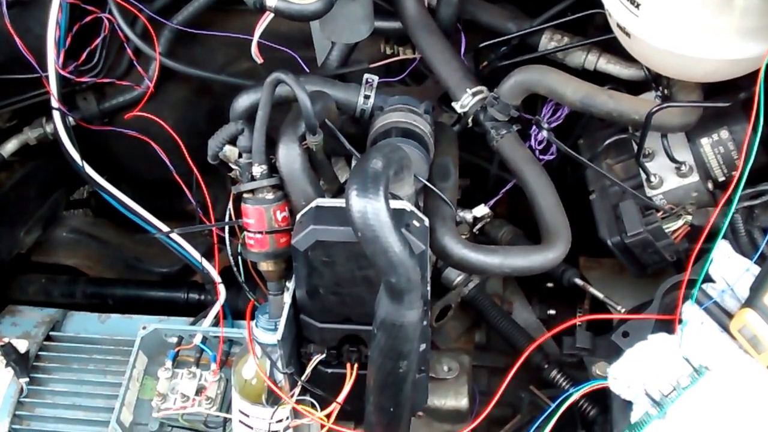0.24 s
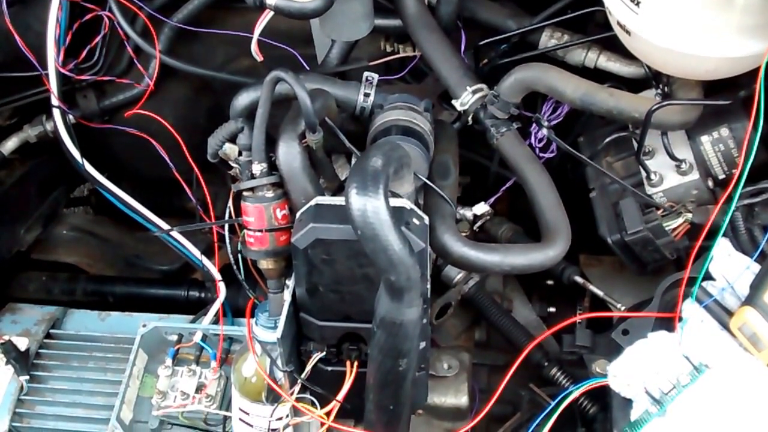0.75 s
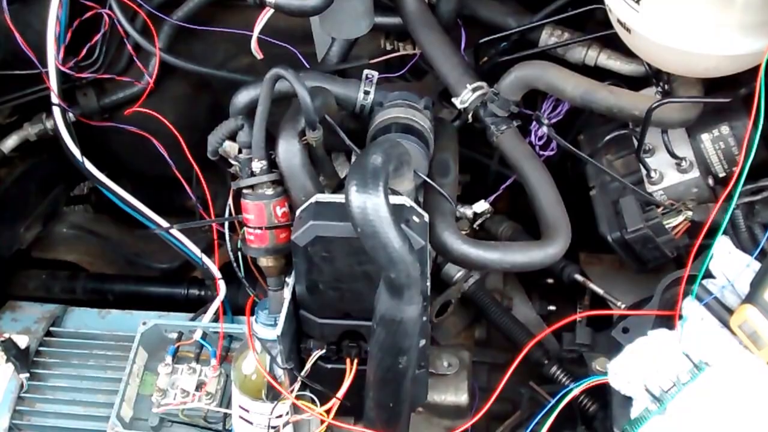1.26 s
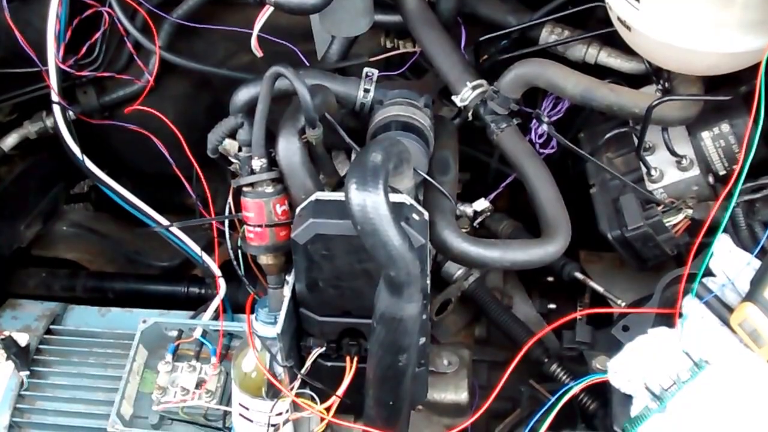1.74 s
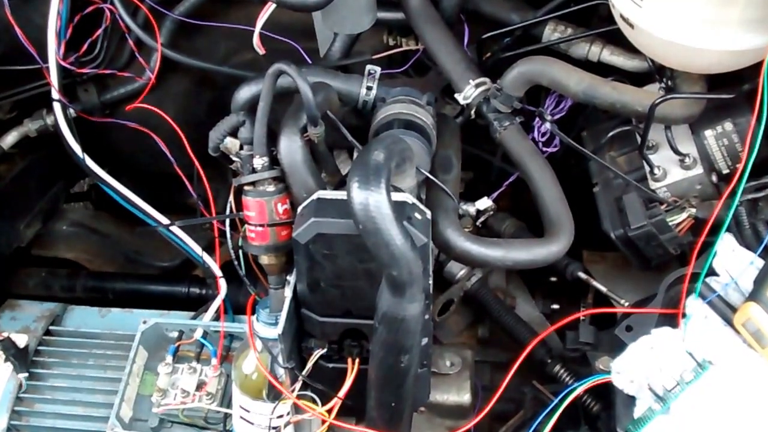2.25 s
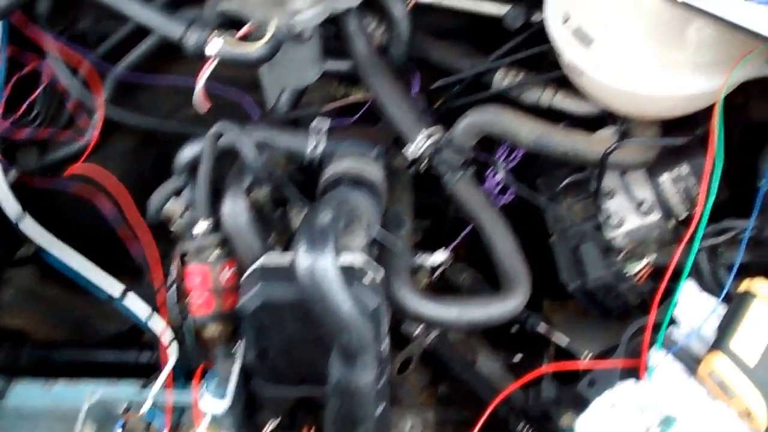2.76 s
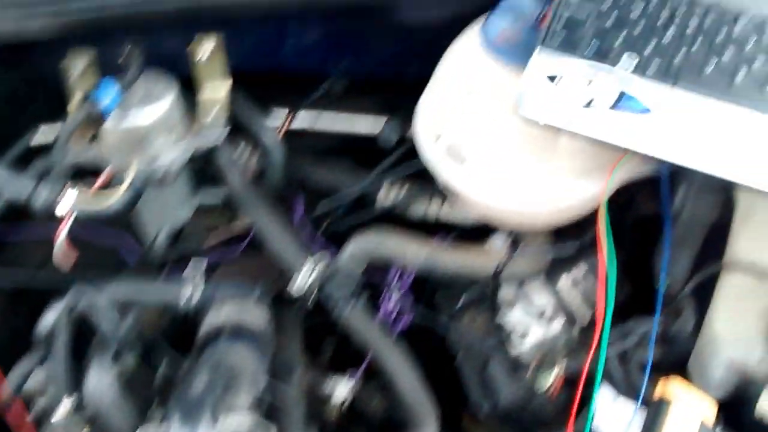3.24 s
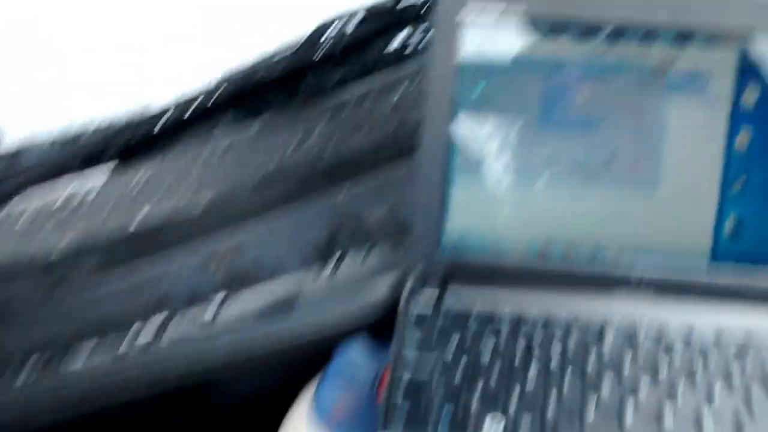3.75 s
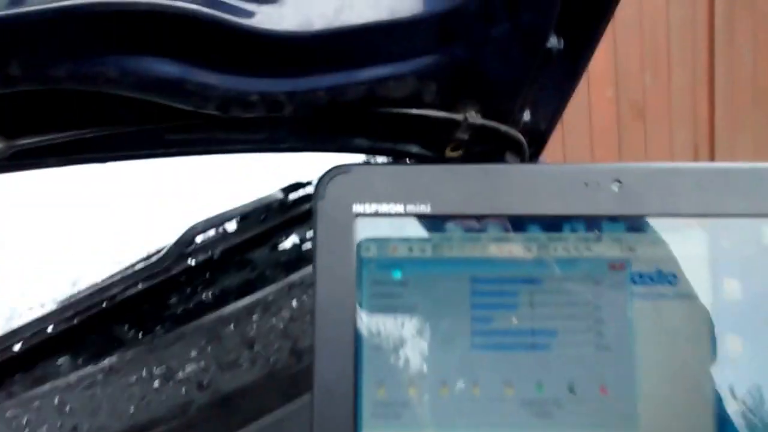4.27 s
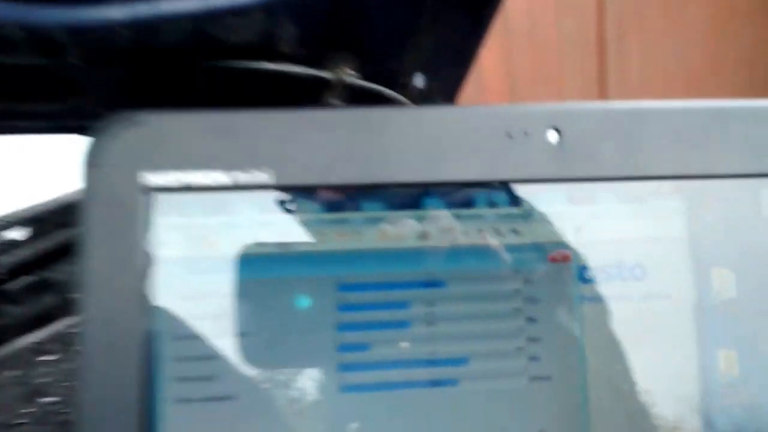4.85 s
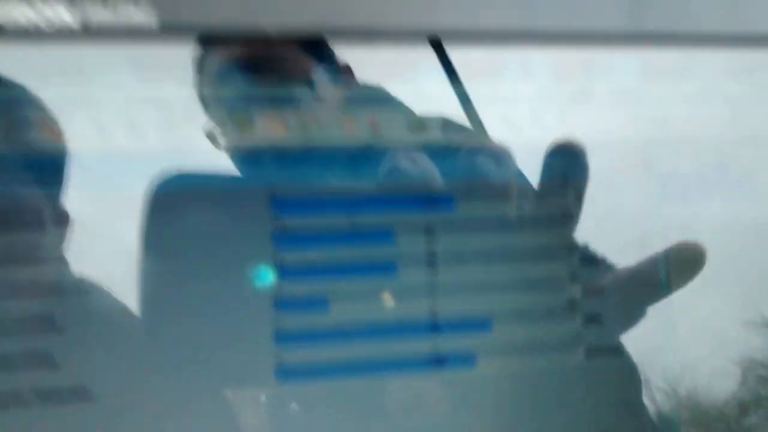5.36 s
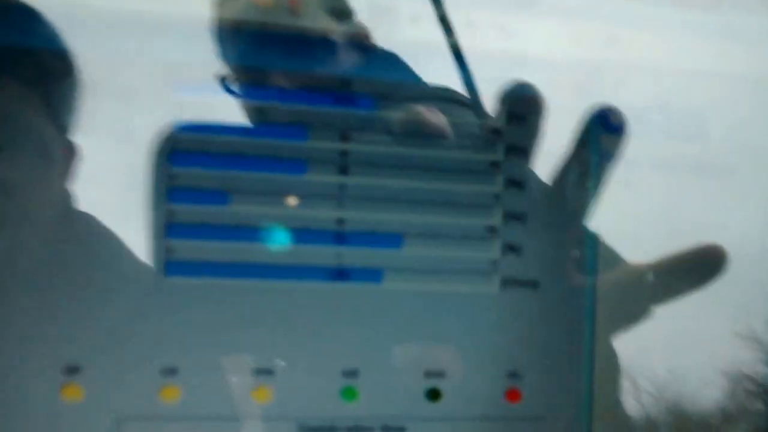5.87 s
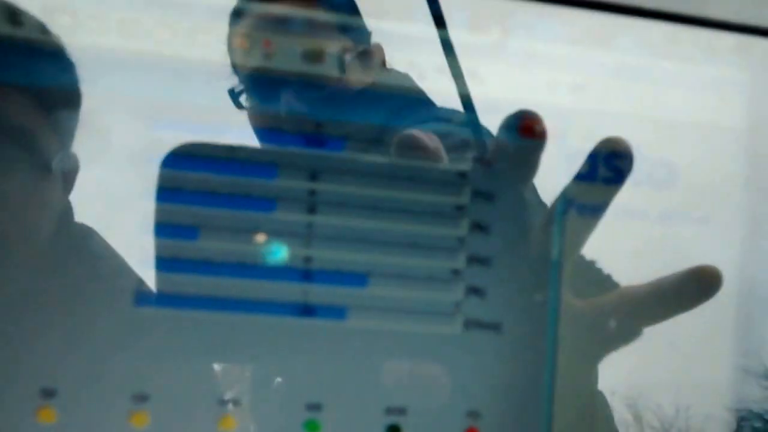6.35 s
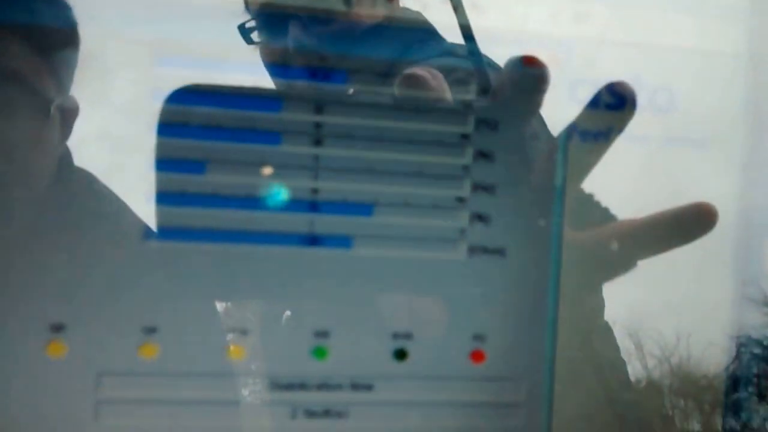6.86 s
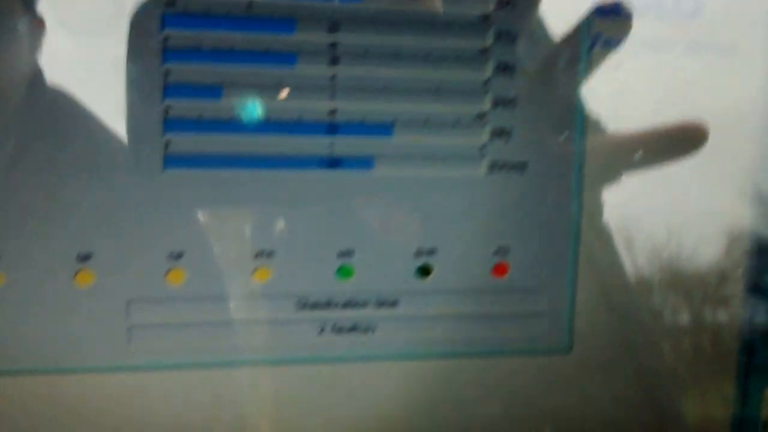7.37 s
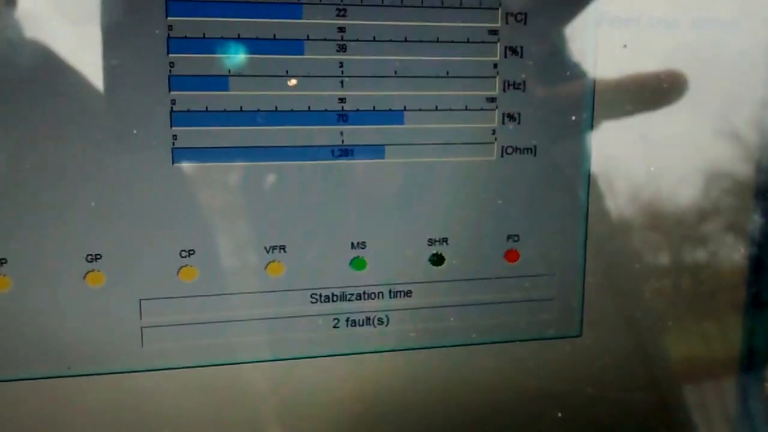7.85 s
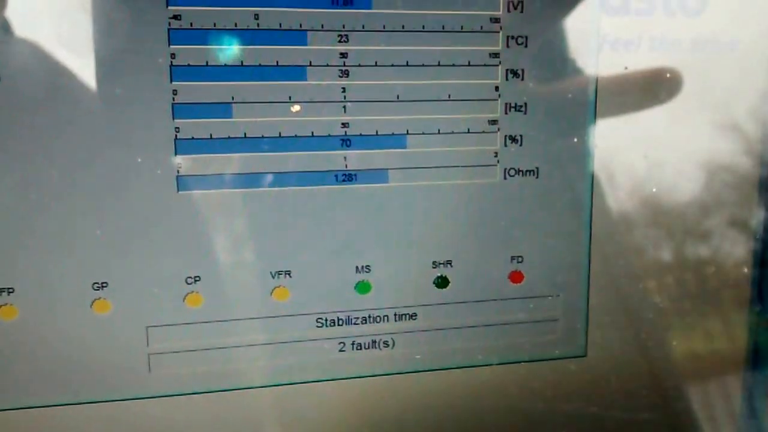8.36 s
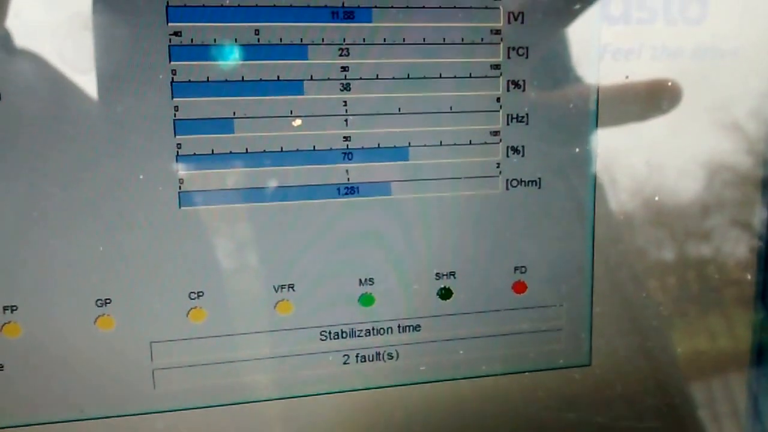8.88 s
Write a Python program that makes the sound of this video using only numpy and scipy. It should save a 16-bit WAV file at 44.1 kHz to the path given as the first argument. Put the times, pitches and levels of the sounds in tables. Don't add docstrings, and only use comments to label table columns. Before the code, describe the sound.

Low pulsing howls from a sputtering fuel burner surge and drop over rushing air and thin motor whine, with brief plastic taps midway.

```python
import sys
import numpy as np
from scipy import signal
from scipy.fft import rfft, irfft
from scipy.io import wavfile
from scipy.ndimage import uniform_filter1d

SR = 44100
rng = np.random.default_rng(int(sys.argv[2]) if len(sys.argv) > 2 else 0)


def undo_db(level):
    steps = np.asarray(level, float) / 20
    return 10 ** steps


def master_out(mix):
    frames = np.transpose(np.atleast_2d(mix))
    ceiling = np.clip(frames, -1, 1)
    pcm = np.round(ceiling * 32767).astype(np.int16)
    wavfile.write(sys.argv[1], SR, pcm)


N = 401751

SHAFT_HZ = 49.35
BASS_LAG_S = 0.00027

# time_s, place (0 at the heater, 1 turning away, 2 beside the wing)
MIC_PATH = [(0, 0.033), (3.4, 0.074), (4.5, 0.98), (5.0, 1.25), (5.8, 1.37), (6.2, 1.71), (9.11, 1.7)]
# start_s, peak_db, left_minus_right_db
FUEL_CATCHES = [(0.523, -27, -1), (0.655, -34, -9), (.723, -37, -0.5), (0.8, -23.5, -1), (1.421, -26.5, 0),
                (1.453, -25, 1), (1.875, -24, 2), (1.887, -26, -2), (2.363, -31, 3), (2.717, -42, -2),
                (2.786, -28, 2), (2.799, -27, 3), (2.847, -33, -1), (3.118, -40, -3), (3.193, -26, 4),
                (3.803, -25, 2), (4.43, -43, 2), (4.953, -38, -2), (5.492, -28, -9), (5.817, -22, 0),
                (6.259, -25, 6), (6.677, -44, 2), (6.764, -20.5, 3), (6.955, -29, 0), (7.004, -21.5, 4),
                (7.028, -25.5, 3), (7.352, -36, 1.0), (7.774, -25, 4), (8.051, -35, 0), (8.149, -29, 1),
                (8.58, -26, -3), (8.772, -21.5, 3), (8.968, -36, 6)]


def rms_one(x):
    return x / np.sqrt(np.mean(x ** 2) + 1e-20)


def in_time(rows):
    s, *columns = np.transpose(rows)
    return [np.interp(np.arange(N) / SR, s, c) for c in columns]


def at_hz(points, hz):
    table_hz, value = np.transpose(points)
    return np.interp(np.log(hz), np.log(table_hz), value)


def drift(hz):
    r = np.exp(-2 * np.pi * hz / SR)
    wander = signal.lfilter([1], [1, -2 * r, r * r], rng.standard_normal(N + SR))
    return rms_one(wander[SR:])


def resonance(x, hz, width_hz):
    r = np.exp(-np.pi * width_hz / SR)
    turn = 2 * np.pi * hz / SR
    return signal.lfilter([(1 - r * r) / 2, 0, (r * r - 1) / 2], [1, -2 * r * np.cos(turn), r * r], x + 1e-18)


def pan(x, lr_db, lag_s=0):
    left = np.interp(np.arange(N) - lag_s * SR, np.arange(N), x)
    return np.array([left * undo_db(lr_db / 2), x * undo_db(-lr_db / 2)])


def strikes(events, db=0):
    out = np.zeros((2, N))
    for row in events:
        sides = undo_db(np.array([0.5, -0.5]) * row[-1])
        out[:, min(round(row[0] * SR), N - 1)] = undo_db(row[1] + db) * sides
    return out


def mic_place():
    return in_time(MIC_PATH)[0]


def at_spot(column):
    # rumble_db, exhaust_roar_db, casing_rasp_db, hiss_db, whine_left_minus_right_db, overtone_left_minus_right_db
    spot_levels = [
        (-38.5, -42.5, -46.5, -60.5, -5.5, 0),
        (-38.5, -43, -43.5, -57.5, 2.5, 0.5),
        (-35.5, -41, -44.5, -58, 4.5, -3),
    ]
    return np.interp(mic_place(), [0, 1, 2], np.array(spot_levels)[:, column])


def swells():
    # peak_s, level_db, rise_s, fall_s
    swell_rows = [(0.014, -12.5, 0.034, 0.042), (.1, -15.5, 0.049, 0.13), (0.539, -13, 0.11, 0.024),
                  (.41, -32.5, 0.029, 0.019), (1.29, -26, 0.019, 0.015), (1.34, -23, 0.012, 0.024),
                  (5.21, -42, 0.059, 0.044), (6.47, -23.5, 0.014, 0.036), (8.27, -25, 0.045, 0.053),
                  (.673, -14.5, 0.19, 0.028), (.829, -11.5, 0.2, .16), (1.449, -12.5, 0.085, 0.14),
                  (1.902, -11, 0.065, 0.11), (2.373, -12, 0.1, 0.097), (2.582, -22, 0.08, .03),
                  (2.779, -12.5, 0.16, 0.13), (3.236, -12.5, .21, 0.1), (3.823, -12.5, 0.069, 0.097),
                  (4.027, -13.5, 0.13, 0.15), (4.209, -16, 0.035, .058), (4.334, -13.5, 0.093, 0.069),
                  (4.429, -15.5, 0.038, 0.045), (4.846, -16.5, 0.1, 0.046), (4.975, -13.5, 0.058, 0.13),
                  (5.34, -15, 0.098, 0.1), (5.488, -16.5, 0.092, 0.064), (5.848, -15, 0.068, 0.22),
                  (6.273, -16, 0.37, 0.071), (6.756, -14.5, 0.12, 0.09), (7.005, -14.5, 0.087, 0.15),
                  (7.371, -15.5, 0.11, 0.035), (7.821, -15, 0.08, 0.13), (8.16, -14, 0.14, .1),
                  (8.612, -15.5, 0.097, 0.14), (8.795, -14, 0.054, 0.11), (9.035, -17.5, .08, 0.31)]
    roundness, idle_db = 1.859, -37.5
    t, power = np.arange(N) / SR, np.full(N, undo_db(idle_db) ** 2)
    for peak, db, rise, fall in swell_rows:
        near = slice(max(int((peak - rise) * SR), 0), int((peak + fall) * SR))
        away = np.where(t[near] < peak, (peak - t[near]) / rise, (t[near] - peak) / fall)
        arch = np.clip(1 - away ** roundness, 0, 1)
        power[near] += (undo_db(db) * arch) ** 2
    return np.sqrt(power)


def howl_strength():
    # centre_s, lost_share of pressure (0-1, negative = gained)
    falters = [(.655, -0.063), (.81, -0.13), (.87, -0.0085), (1.4, 0.18), (1.885, -0.021), (1.96, -0.26),
               (2.33, -0.029), (2.457, -0.7), (2.55, -0.015), (2.73, 0.12), (2.8, -0.21), (3.15, -0.049),
               (3.84, 0.072), (3.935, -0.36), (4.0, -0.11), (5.33, 0.083), (5.82, -.2), (6.79, -0.12),
               (7.82, -0.18), (8.74, .3), (.135, 0.88), (0.187, 0.56), (0.577, 0.69), (.61, 0.071),
               (.702, 0.39), (.76, -0.43), (.787, 0.19), (.91, -0.57), (1.44, -0.15), (1.5, 0.41),
               (1.552, -0.48), (1.584, 1), (1.93, 0.17), (2.44, 0.41), (2.684, 0.61), (2.768, 0.65),
               (2.854, -0.47), (3.27, -0.24), (3.3, -0.29), (4.8, 0.21), (4.97, 0.11), (5.425, 0.17),
               (5.84, 0.18), (5.914, 0.11), (5.97, -0.5), (6.041, .45), (6.13, -0.2), (6.185, 0.4),
               (6.28, -0.27), (6.69, 0.013), (6.735, 0.67), (7.785, -0.55), (7.9, -0.47), (8.07, 0.31),
               (8.101, 0.57), (8.23, 0.71), (8.63, -0.13), (8.66, 0.21), (8.71, -0.71), (9.03, -0.07)]
    falter_s = 0.015
    kick_share, kick_rise_s, kick_fall_s = 0.19, 0.0043, 0.018
    t, age = np.arange(N) / SR, np.arange(SR // 5) / SR
    kick = np.exp(-age / kick_fall_s) * (1 - np.exp(-age / kick_rise_s))
    catches = np.zeros(N)
    catches[(np.array(FUEL_CATCHES)[:, 0] * SR).astype(int)] = kick_share / kick.max()
    lift = 1 + signal.fftconvolve(catches, kick)[:N]
    dents = sum(min(share, 0.95) * np.exp(-((t - s) / falter_s) ** 2) for s, share in falters)
    return swells() * lift * (1 - dents)


def howl():
    howl_pan_db = [
        1.5,
        4,
        4.6,
    ]
    rest_hz, hz_per_pressure, hz_per_growth = 224.5, 22.15, 0.11
    pressure = howl_strength()
    lr_db = np.interp(mic_place(), [0, 0.3, 2], howl_pan_db)
    growth = np.gradient(uniform_filter1d(swells(), size=900)) * SR
    hz = rest_hz + hz_per_pressure * pressure + hz_per_growth * growth
    phase = np.pi / 2 + 2 * np.pi * np.cumsum(hz + 2.474 * drift(22.75)) / SR
    octave = undo_db(-34 + 2 * drift(12)) * np.sin(2 * phase + 1.3 + 1.2 * drift(12))
    tone = np.sin(phase) + octave
    skirt = rms_one(resonance(resonance(rng.standard_normal((2, N)), 272, 54), 272, 54))
    strength = pressure * undo_db(0.3 * drift(28))
    sung = pan(np.sqrt(2) * strength * tone, lr_db, BASS_LAG_S)
    return sung + undo_db(-18.5) * strength * skirt, phase


def puffs():
    age = np.arange(int(0.08 * SR)) / SR
    shape = np.exp(-age / 0.013) * (1 - np.exp(-age / 0.0027))
    envelope = signal.fftconvolve(strikes(FUEL_CATCHES, db=-15.0), [shape])[:, :N]
    exhaust = signal.butter(2, [330, 1600], "band", fs=SR, output="sos")
    noise = rms_one(signal.sosfilt(exhaust, rng.standard_normal(N)))
    burst = envelope * noise + signal.sosfilt(exhaust, strikes(FUEL_CATCHES, db=20.0))
    ringing = 8.2 * resonance(burst, 454, 91)
    return signal.sosfilt(exhaust, burst + ringing - strikes(FUEL_CATCHES, db=3))


def casing():
    # pitch_hz, width_hz, heater_db, last_spot_db, left_minus_right_db
    pipe_modes = [(892, 60, -58, -36.5, 8.5), (1248, 140, -48, -38, -0.5), (3312, 110, -59, -36.5, -13.5),
                  (3870, 81, -54, -48, -6.5)]
    passing_extra = [-2, 10, -5, 0]
    away, effort, out = mic_place() / 2, howl_strength() / 0.32, 0
    middle = np.clip(1.3 - 4 * abs(2 * away - 1.07), 0, 1)
    for (hz, width, near_db, far_db, lr_db), passing_db in zip(pipe_modes, passing_extra):
        ring = rms_one(resonance(resonance(rng.standard_normal(N), hz, width), hz, width))
        level_db = near_db + away * (far_db - near_db) + passing_db * middle + 0.8 * drift(9.6)
        drive = (effort + 0.35 * middle) ** 1.76
        out = out + pan(undo_db(level_db) * drive * ring, lr_db, BASS_LAG_S * (hz > 2000))
    return out


def ducking_db():
    # start_s, depth_db
    clamp_rows = [(0.029, 4), (.53, 3.5), (.8, 5), (1.459, 4), (1.91, 3), (2.39, 4), (2.8, 4), (3.2, 3),
                  (3.82, 3), (5.0, 1.5), (5.84, 2), (6.3, 0), (7.03, 2), (7.37, 0.5), (7.83, 1), (8.17, 0),
                  (8.8, 0.5)]
    headroom_db, clamp_s, regain_db_per_s = 1.48, 0.0053, 9
    t = np.arange(N) / SR
    starts, depth_db = np.transpose([(-0.86, 9.8), *clamp_rows])
    last = np.searchsorted(starts, t) - 1
    held = np.minimum(regain_db_per_s * (t - starts[last]) - depth_db[last], headroom_db)
    r = np.exp(-1 / (clamp_s * SR))
    return signal.lfilter([1 - r], [1, -r], held)


def spot_noise(spot, edges_hz):
    # pitch_hz, level_db
    colours = [
        [(15, -55.5), (25, -30), (169, -23), (233, -1.5), (368, -25.5), (919, -30.5), (1750, -41), (1950, -36),
         (2560, -40), (3930, -44), (11200, -55), (15500, -69.5)],
        [(15, -50), (25, -10.5), (227, 9.5), (368, -20), (1050, -33.5), (1300, -28.5), (1850, -43.5),
         (3830, -24), (6920, -40.5), (7700, -46), (11800, -41), (15500, -72)],
        [(15, -49), (25, -17.5), (169, -24.5), (227, -5), (433, -13.5), (1270, -26), (1800, -35), (3260, -41.5),
         (6920, -46), (7500, -51), (11800, -51.5), (15500, -58.5)],
    ]
    # pitch_hz, width_hz, boost_db
    peaks_and_dips = [
        [(135.3, 10, 12.6), (516, 39, 3), (810, 30, -5.5), (898, 80, 6), (1010, 90, -4.5), (1330, 70, -5.5),
         (1440, 80, 3.5), (1256, 97, 9.6), (3060, 150, 1.9), (3960, 72, 4.6), (6800, 240, 5.1), (11000, 440, 6),
         (11500, 140, 7.4), (11900, 200, 4)],
        [(111, 62, 1.3), (770, 280, 7.5), (1130, 110, 2.9), (2207, 690, 23), (3060, 100, 4.3),
         (4100, 2500, 4.6), (6920, 360, 8.3), (8200, 900, 7.1), (11800, 400, 5.7)],
        [(564, 76, 6), (915, 60, 4), (1000, 80, -2.5), (1080, 50, -5), (1400, 80, -4), (831, 61, 7.5),
         (1282, 42, 9.5), (1545, 120, 12), (1830, 160, 0), (2450, 300, -1), (3073, 70, 12.5), (3300, 150, 15),
         (3940, 300, 6), (6720, 470, 4.5), (11860, 900, 3)],
    ]
    # pitch_hz, left_minus_right_db
    balances = [
        [(60, 11.5), (110, 1), (200, 5), (380, 2), (700, 1), (1290, -3), (2380, -8.5), (4400, -7.5), (8120, 3),
         (15000, 2)],
        [(60, 16), (110, 8.5), (200, 1), (380, 1.5), (700, 3.5), (1290, -1.5), (2380, -3), (4400, -9),
         (8120, -1), (15000, -2)],
        [(60, 0.5), (110, 20), (200, 14), (380, 1.5), (700, -1), (1290, 7), (2380, -5.5), (4400, -13),
         (8120, 6.5), (15000, 7)],
    ]
    # pitch_hz, lead_radians
    port_leads = [(25, -2.8), (50, -1.8), (90, -.4), (300, -.5), (480, -.1), (1500, -.2), (2100, -3.2),
                  (3360, -6), (4050, -6.6), (5860, -11.6), (7320, -14.7), (15500, -28.7)]
    # pitch_hz, likeness (0-1)
    likeness = [(25, 0.7), (50, 1), (100, 0.6), (250, 0.93), (350, .55), (500, 0.54), (1200, 0.91),
                (1800, 0.65), (2500, 1), (4000, 0.44), (7500, 0.1), (14000, 0.8)]
    hz = np.maximum(np.fft.rfftfreq(N, 1 / SR), 1)
    level_db = at_hz(colours[spot], hz)
    for centre, width, db in peaks_and_dips[spot]:
        level_db += db / (1 + (2 * (hz - centre) / width) ** 2)
    alike = np.clip(at_hz(likeness, hz), 0, 1)
    shared, own = rfft(rng.standard_normal((2, N)))
    each_turn = np.resize(rng.standard_normal(round(SR / SHAFT_HZ)), N)
    scratch = rfft(each_turn * undo_db(4 * drift(3)))
    shared = shared + 0.5 * scratch * (hz > 1900) * np.clip(hz / 6000, 0.8, 1.5)
    lead = np.interp(hz, *np.transpose(port_leads))
    tilt = undo_db(at_hz(balances[spot], hz) / 2)
    left = shared * np.exp(1j * lead) * tilt
    right = (alike * shared + np.sqrt(1 - alike ** 2) * own) / tilt
    pair = undo_db(level_db) * np.array([left, right])
    bands = [irfft(pair * (hz >= low) * (hz < high), N) for low, high in edges_hz]
    return np.array([band / np.std(band.mean(axis=0)) for band in bands])


def air(flame_phase):
    # time_s, level_db
    draught = [(0, 1.5), (1.3, 4), (2.2, 0), (3.0, 1.5), (3.75, 1.5), (4.3, -0.9), (4.8, 2), (5.7, 3),
               (6.3, 1), (7.1, -0.5), (7.7, 1.5), (9.11, -0.5)]
    # centre_s, width_s, extra_hiss_db
    hand_rub = (5.57, 0.13, 1.6)
    t, place = np.arange(N) / SR, np.clip(mic_place(), 0, 2)
    edges_hz = [(20, 190), (190, 380), (380, 1900), (1900, 5800), (5800, 15050)]
    bands = sum(np.sqrt(np.clip(1 - abs(place - k), 0, 1)) * spot_noise(k, edges_hz) for k in range(3))
    rumble, body, roar, rasp, hiss = bands
    effort = np.clip(howl_strength() / 0.19, 0, 1)
    common_db = in_time(draught)[0] + ducking_db() + 1.0
    roar_db = at_spot(column=1) + common_db + 3.5 * effort
    rasp_db = at_spot(column=2) + common_db + 1.5 * effort
    rumble_db = at_spot(column=0) + 0.73 * common_db + 0.5 * drift(0.81)
    rub_s, rub_width_s, rub_db = hand_rub
    hiss_db = at_spot(column=3) + common_db + rub_db * np.exp(-((t - rub_s) / rub_width_s) ** 2)
    cycle = 1 + 0.13 * effort * np.sin(flame_phase)
    turn = 1 + 0.075 * np.cos(2 * np.pi * SHAFT_HZ * t) ** 9
    gust = drift(8.1)
    out = undo_db(rumble_db + 1.2 * drift(23)) * rumble
    out = out + undo_db(0.92 * roar_db + 2.5 + 2.0 * drift(36)) * body
    out = out + undo_db(roar_db - 3.5 + gust) * cycle * roar
    out = out + undo_db(rasp_db - 4.5 + 0.5 * gust) * cycle * turn * rasp
    return out + undo_db(hiss_db - 1.0 + 0.89 * drift(24)) * turn * hiss


def motor():
    # time_s, level_db
    whine = [(0.0, -57.5), (0.3, -56), (1.4, -56.5), (1.52, -59), (1.75, -58), (2.86, -58.5), (3.25, -53),
             (3.7, -61), (4.06, -66), (4.4, -66), (4.55, -76), (4.95, -74), (5.1, -66.5), (6.5, -65),
             (7.1, -78), (7.54, -68), (9.11, -67)]
    # time_s, level_db
    overtone = [(0.0, -68.5), (2.41, -68), (3.37, -70), (4.44, -69), (4.74, -62.5), (6.67, -70.5),
                (7.26, -70.5), (7.64, -59.5), (9.11, -63)]
    # multiple, heater_db, last_spot_db
    shaft_orders = [(19, -61, -59), (43, -72, -73), (50, -73, -79), (52, -79, -75), (56, -67, -76),
                    (60, -65, -72), (64, -73, -62), (67, -75, -62), (76, -71, -63), (79, -66, -67),
                    (84, -75, -68), (98, -78, -72)]
    side_lines = [
        -73,
        -72,
    ]
    t, whine_hz = np.arange(N) / SR, 1964.4
    shaft, phase = 2 * np.pi * SHAFT_HZ * t, 2 * np.pi * whine_hz * t
    sides = sum(undo_db(side_db) * np.sin(phase + (k + 1) * shaft) for k, side_db in enumerate(side_lines))
    main = undo_db(in_time(whine)[0] + 1.4 * drift(6)) * np.sin(phase)
    out = pan(main + sides, at_spot(column=4))
    high = undo_db(in_time(overtone)[0] + 1.5 * drift(8)) * np.sin(3 * phase + 0.5 * drift(4))
    out += pan(high, at_spot(column=5))
    away = mic_place() / 2
    out += pan(undo_db(-63 - 10 * away) * np.sin(16 * shaft), 2)
    out += pan(undo_db(-73) * (np.sin(44 * shaft) + np.sin(45 * shaft)), -4)
    for multiple, near_db, far_db in shaft_orders:
        level = undo_db(near_db + away * (far_db - near_db) + 2.0 * drift(3) - 1.5)
        tone = level * np.sin(multiple * shaft + multiple / 60 * drift(5))
        out += pan(tone, 0, BASS_LAG_S * (multiple > 40))
    return np.sqrt(2) * undo_db(0.53 * ducking_db() + 4.5) * out


def whistle():
    # time_s, pitch_hz, level_db
    intake_edge = [(0, 11500, -84), (2.9, 11620, -82.5), (3.15, 11800, -62), (3.4, 11890, -85),
                   (3.72, 11740, -66.5), (4.0, 11750, -66.5), (4.7, 11780, -72.5), (5.9, 11800, -69),
                   (7.5, 11800, -65), (7.8, 11800, -72), (8.4, 11700, -68), (9.11, 11660, -67)]
    hz, db = in_time(intake_edge)
    phase = 2 * np.pi * np.cumsum(hz + 22 * drift(9) + 40 * drift(90)) / SR
    neighbour = undo_db(-5 + 3 * drift(8)) * np.sin(1.028 * phase)
    tone = np.sin(phase) * undo_db(3 * drift(20)) + neighbour
    return pan(np.sqrt(2) * undo_db(db + ducking_db()) * tone, 1.5, BASS_LAG_S)


def ticks():
    # start_s, nail_db, shell_db, knock_db, knock_hz
    finger_taps = [(5.391, -31, -40, -29, 700), (5.4525, -35, -40, -17, 800), (5.605, -35, -42, -12, 700),
                   (5.8328, -9.5, -13, -18, 1200), (5.862, -36, -36, -33, 900),
                   (5.9292, -22, -22, -17, 1100), (5.9696, -27, -23, -17, 1300),
                   (6.0948, -17, -10, -13, 1400)]
    hand_pan_db = -5.5
    bounce_s, bounce_db = 0.00034, -4
    out, rounded = np.zeros((2, N)), signal.butter(2, 12000, fs=SR, output="sos")
    for s, nail_db, shell_db, knock_db, knock_hz in finger_taps:
        first = (s, nail_db, 1.1 * hand_pan_db)
        second = (s + bounce_s, nail_db + bounce_db, hand_pan_db)
        nail = strikes([first, second])
        shell = strikes([(s, shell_db, 2.6 * hand_pan_db)])
        knock = strikes([(s + bounce_s / 2, knock_db, hand_pan_db)])
        crack = 3.2 * resonance(nail, 8800, 4000) + 3.0 * resonance(shell, 4400, 1600)
        out -= signal.sosfilt(rounded, crack)
        soft = signal.butter(2, 2 * knock_hz, fs=SR, output="sos")
        out += signal.sosfilt(soft, 8.0 * resonance(knock, knock_hz, 1.6 * knock_hz))
    return out


def chirps():
    # start_s, level_db
    bird_notes = [(7.478, -60), (7.517, -52), (7.558, -49), (7.598, -49), (7.635, -57)]
    # start_s, end_s, pitch_hz, level_db
    skin_rub = (5.25, 5.36, 13200, -61)
    t, out = np.arange(N) / SR, 0
    for start, db in bird_notes:
        age = np.clip((t - start) / 0.038, 0, 1)
        phase = 2 * np.pi * np.cumsum(7000 + 1000 * (1 - age) ** 1.3) / SR
        out = out + undo_db(db) * np.sin(np.pi * age) ** 0.5 * np.sin(phase)
    out = out * (1 + 0.35 * drift(250))
    out = out + undo_db(-5) * np.roll(out, round(0.011 * SR)) + undo_db(-8) * np.roll(out, round(0.023 * SR))
    start, end, hz, db = skin_rub
    age = np.clip((t - start) / (end - start), 0, 1)
    squeak = undo_db(db) * np.sin(np.pi * age) * rms_one(resonance(rng.standard_normal(N), hz, 120))
    return pan(out, -2.5) + pan(squeak, -1.5)


def traffic():
    # start_s, end_s, from_hz, to_hz, level_db
    far_engines = [
        (.95, 1.5, 420, 445, -54),
        (4.75, 5.6, 422, 455, -53),
        (7.45, 8.05, 582, 522, -51),
        (7.5, 8.0, 388, 350, -49),
    ]
    t, out = np.arange(N) / SR, 0
    for start, end, from_hz, to_hz, db in far_engines:
        age = np.clip((t - start) / (end - start), 0, 1)
        phase = 2 * np.pi * np.cumsum(from_hz + (to_hz - from_hz) * age) / SR
        out = out + undo_db(db) * np.sin(np.pi * age) ** 0.5 * np.sin(phase)
    return pan(np.sqrt(2) * undo_db(2 * drift(10)) * out, 1, BASS_LAG_S)


def scene():
    tone, flame_phase = howl()
    heater = tone + puffs() + casing() + air(flame_phase) + motor() + whistle()
    return heater + ticks() + chirps() + traffic()


def band_limit(x):
    return signal.sosfilt(signal.butter(12, 15480, fs=SR, output="sos"), x)


def record(dry):
    # pitch_hz, width_hz, depth_db
    port_dips = [(2610, 600, -3), (5660, 590, -3), (7580, 670, -3), (9910, 1200, -7.5), (12750, 600, -4)]
    treble = signal.butter(8, [12500, 15250], "band", fs=SR, output="sos")
    hiss = rms_one(signal.sosfilt(treble, rng.standard_normal((2, N))))
    hz = np.fft.rfftfreq(N, 1 / SR)
    ports = undo_db(sum(db / (1 + (2 * (hz - centre) / width) ** 2) for centre, width, db in port_dips))
    rounded = 0.98 * np.tanh(dry / 0.99)
    heard = irfft(rfft(rounded + undo_db(-71.0) * hiss) * ports, N)
    return band_limit(heard)


dry = scene()
out = record(dry)
master_out(out)
```